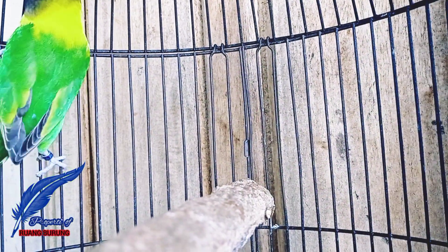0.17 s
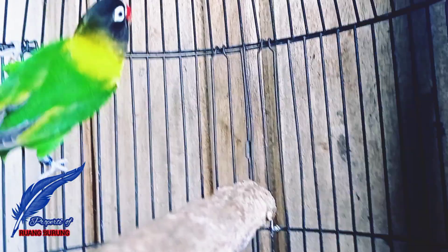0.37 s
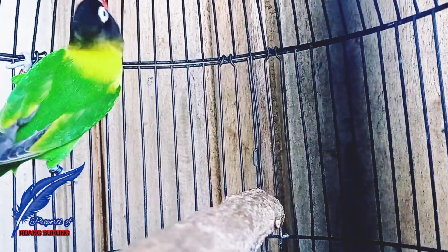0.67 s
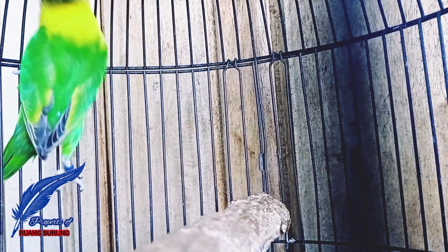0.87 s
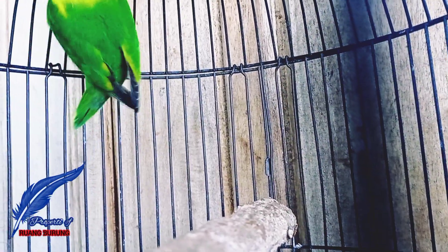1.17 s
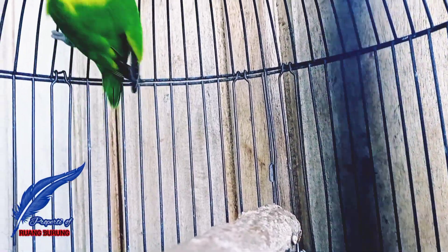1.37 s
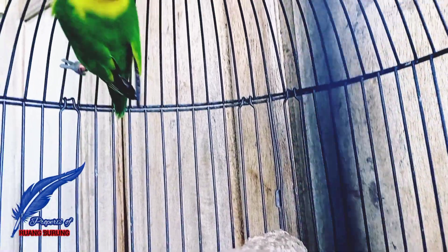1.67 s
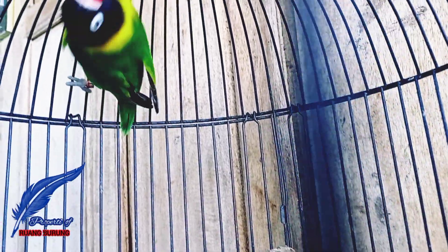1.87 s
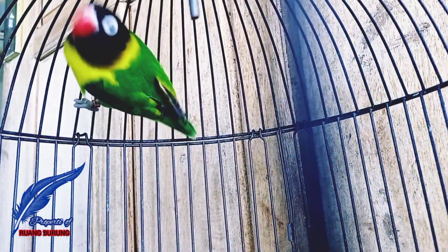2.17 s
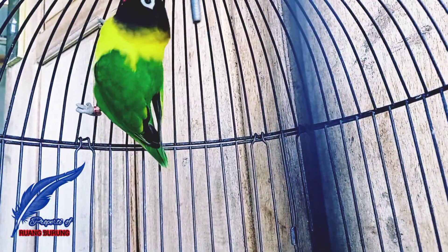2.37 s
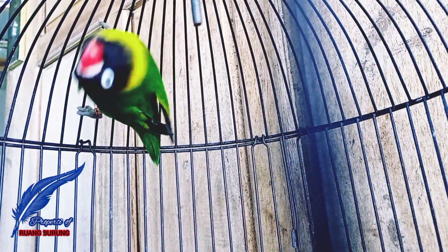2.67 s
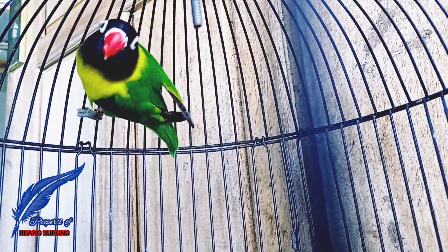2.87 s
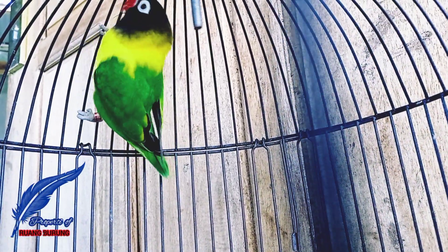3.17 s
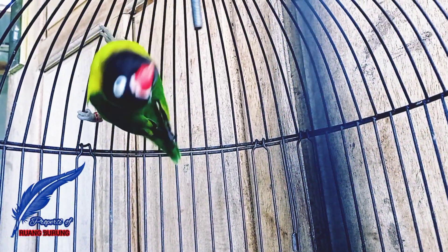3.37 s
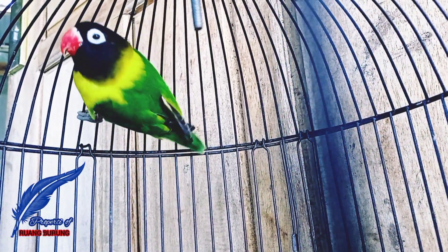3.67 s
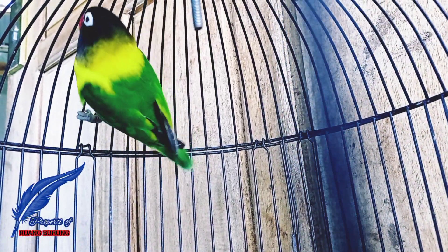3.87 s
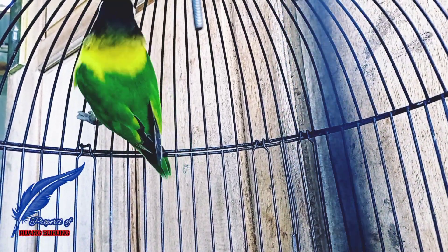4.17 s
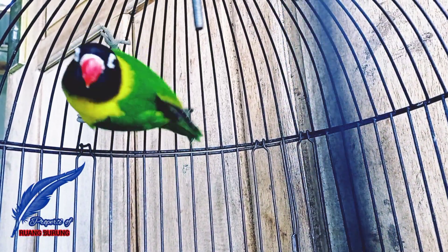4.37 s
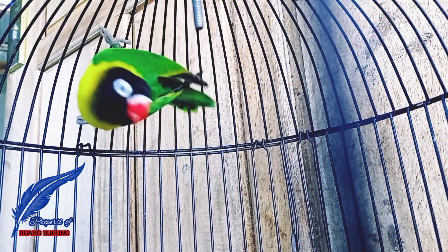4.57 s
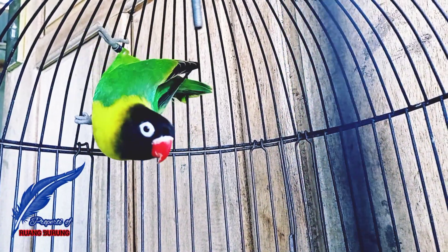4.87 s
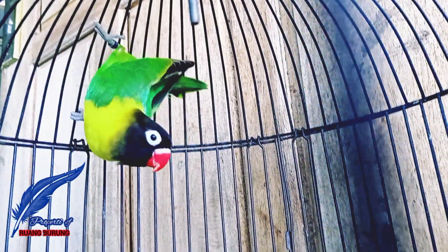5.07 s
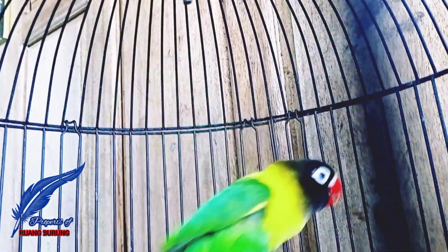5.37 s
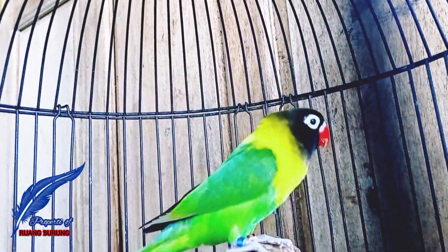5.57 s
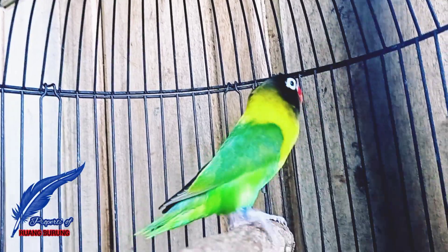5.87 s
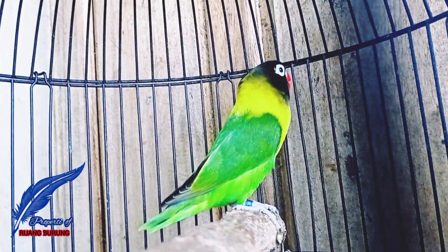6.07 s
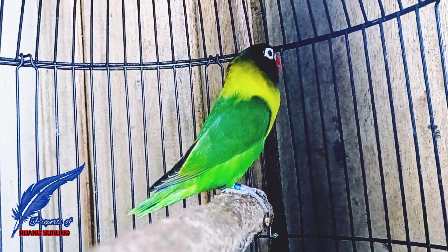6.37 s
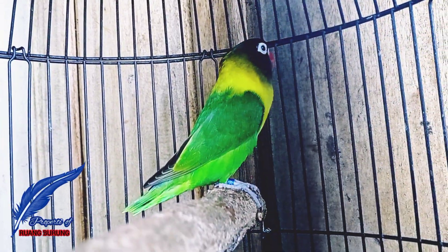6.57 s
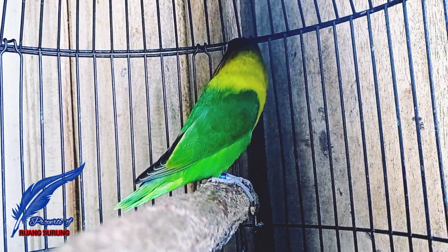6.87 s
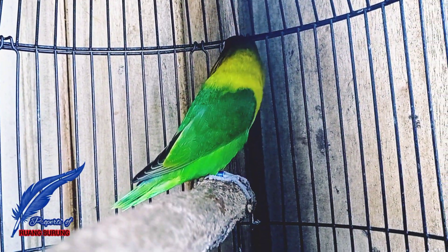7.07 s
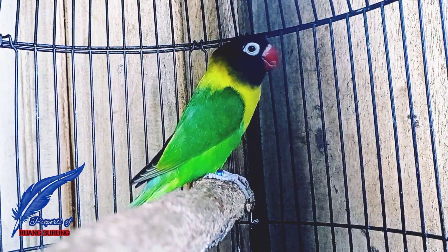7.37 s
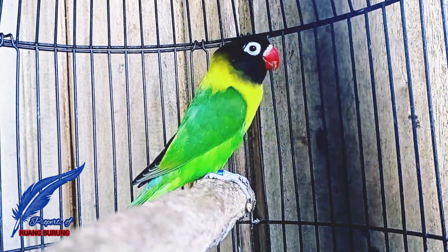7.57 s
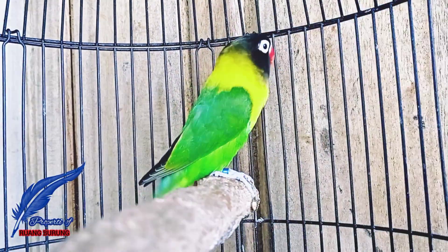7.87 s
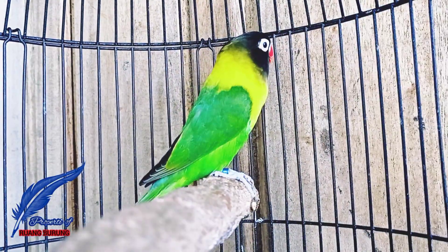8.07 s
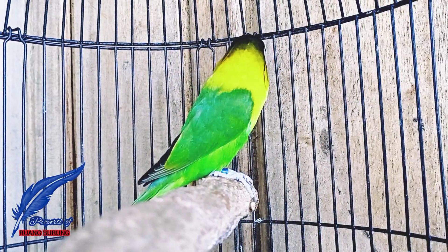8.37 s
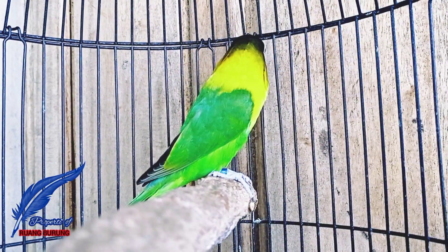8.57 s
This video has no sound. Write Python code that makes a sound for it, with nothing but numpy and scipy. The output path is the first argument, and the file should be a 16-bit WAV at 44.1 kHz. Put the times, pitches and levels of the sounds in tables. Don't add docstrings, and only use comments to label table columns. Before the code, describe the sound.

Rapid, piercing lovebird chatter changes character several times over a faint yard rumble and hum, with a few light wooden knocks and distant coos.

```python
import sys
import numpy as np
from scipy import signal
from scipy.fft import rfft, irfft, next_fast_len
from scipy.io import wavfile
from scipy.ndimage import uniform_filter1d, minimum_filter1d, map_coordinates

SR = 44100
rng = np.random.default_rng(int(sys.argv[2]) if len(sys.argv) > 2 else 0)


def pcm_store(signal):
    levels = np.round(np.clip(np.atleast_2d(signal), -1, 1) * 32767)
    wavfile.write(sys.argv[1], SR, levels.astype(np.int16).T)


def ratio_of_db(decibels):
    return 10 ** (np.asarray(decibels, float) / 20)


N = 384552

# t/s, lead-in/ms, whistle/ms, level/dB, end f/Hz
SLOW_WHISTLES = [(0.0634, 16, 37, -10, 3675), (0.1815, 14.2, 39.2, -9, 3677), (0.301, 13.6, 38, -9.5, 3625),
                 (0.419, 16, 33.6, -9, 3573), (0.537, 13.2, 36, -9.5, 3645),
                 (0.6529, 13.9, 37.3, -9.5, 3610), (0.7724, 14.2, 35, -8.5, 3603),
                 (0.889, 14.7, 35.3, -8, 3670), (1.0085, 15, 35.2, -8.5, 3656),
                 (1.124, 15.2, 33.3, -8.5, 3610), (1.2417, 15.6, 35, -9.5, 3520),
                 (1.3635, 16.4, 34.4, -10, 3534), (1.4836, 15.9, 33, -10.5, 3433),
                 (1.602, 14.2, 36, -9.5, 3516), (1.7207, 16, 34, -9.5, 3480),
                 (1.8429, 13.5, 34.6, -10, 3453), (1.9614, 15, 32.7, -9.5, 3390),
                 (2.083, 14.4, 35, -10, 3310)]
QUICK_WHISTLES = [(6.824, 12.4, 27, -13.5, 4300), (6.926, 10.2, 24, -15, 4150),
                  (7.0303, 8.9, 27, -16, 4330), (7.1302, 7.3, 27.6, -14.5, 4470),
                  (7.2289, 7.8, 28, -13.5, 4420), (7.3305, 8.3, 27.8, -14.5, 4410),
                  (7.4309, 8.8, 26.8, -15, 4360), (7.5334, 8.4, 24, -14, 4455),
                  (7.634, 8.1, 24.6, -15.5, 4330), (7.7356, 7.7, 26.8, -14.5, 4285),
                  (7.8324, 8.3, 22.9, -14.5, 4426), (7.9317, 9.2, 27, -14.5, 4395),
                  (8.0296, 9.7, 27.4, -13, 4500), (8.129, 7.7, 29.4, -14.5, 4410),
                  (8.2299, 8.1, 27, -14, 4440), (8.3264, 9, 28.4, -14, 4430), (8.426, 9.1, 26, -14, 4490),
                  (8.5283, 9.5, 25.6, -13.5, 4430), (8.6319, 10.8, 24.5, -14.5, 4460)]
# t/s, lead-in/ms, warble/ms, level/dB, f/Hz
WARBLE_CALLS = [(2.203, 9.8, 33, -12.5, 2580), (2.3175, 9.1, 32, -12.5, 2797), (2.428, 10.3, 31, -13, 2940),
                (2.5362, 8.3, 32, -14, 2925), (2.6373, 10, 28, -13, 2875), (2.74, 11, 33.7, -14, 2970),
                (2.8504, 8.5, 35, -13, 2930), (2.9593, 10, 32, -14, 2985),
                (3.0661, 11.3, 34.7, -13.5, 2930), (3.1815, 9.7, 37, -14, 3010),
                (3.2937, 9.8, 31.8, -14.5, 3005), (3.4032, 10.5, 33.4, -14, 2980),
                (3.5137, 11.2, 31, -14.5, 2960), (3.6223, 10.4, 35.4, -14.5, 2976),
                (3.7366, 11.6, 37.4, -13.5, 2966), (3.8528, 12.1, 34.4, -13.5, 3070),
                (3.9693, 9.8, 35.6, -15, 3020), (4.0805, 11.5, 35.4, -15, 2968),
                (4.1938, 11.3, 30, -14, 3075), (4.3059, 7.7, 34, -15.5, 2940)]
# share of the note/1, level/dB
NOTE_FADE = [(0, 9), (.1, 4.5), (.8, -4), (1, -17.5)]
# f/Hz, gain/dB
THROAT_GAIN = [(1500, -30), (2000, -18), (3000, -9.5), (4000, 6), (6300, -11), (8400, -1.5), (10500, -15.5),
               (12500, -20), (15500, -36)]


def along(points, hz):
    f, v = np.transpose(points)
    return np.interp(np.log(hz + 1), np.log(f + 1), v)


def shape(rows, at):
    s, *cols = np.transpose(rows)
    return [np.interp(at, s, c) for c in cols]


def shares(ms):
    return np.linspace(0, 1, round(ms * SR / 1000))


def wobble(count, rate):
    knots = rng.standard_normal(int(count * rate / SR) + 4)
    return map_coordinates(knots, [np.arange(count) * rate / SR])


def noise(colour):
    m = next_fast_len(N)
    x = irfft(rfft(rng.standard_normal(m)) * colour(np.fft.rfftfreq(m, 1 / SR)), m)[:N]
    return x / x.std()


def add(out, s, hz, db, rough, tilt_db=0, notch_db=0, notch_hz=9200):
    # f/Hz, then five levels/dB
    registers = [
        (2192, 5.5, -5.5, 9.5, -7, 5),
        (3148, -8.5, 2, -21.5, -4.5, 16),
        (3674, -0.5, 5, 11, 7, -18),
    ]
    count = len(hz)
    jitter = rough * wobble(count, 1400) + 35 * rough ** 2 * wobble(count, 3500)
    hz = uniform_filter1d(hz, size=24) * (1 + jitter).clip(.5, 1.5)
    phase = 2 * np.pi * np.cumsum(hz) / SR
    order = np.arange(1, 6)[:, None]
    colour_db = np.array(shape(registers, hz)) + along(THROAT_GAIN, order * hz) + tilt_db * np.log2(order)
    colour_db += notch_db / (1 + ((order * hz - notch_hz) / 650) ** 2)
    shimmer_db = [50 * rough * wobble(count, 600) for _ in order]
    gain = ratio_of_db(colour_db + shimmer_db) * (order * hz < .4 * SR)
    offset = order * 0.24 + rng.normal(-1.37, 0.58, order.shape)
    tone = (gain * np.sin(order * phase + offset)).sum(axis=0)
    tone /= np.sqrt((gain ** 2).sum(axis=0) / 2)
    swell = ratio_of_db(db + (.8 + 12 * rough) * wobble(count, 400))
    swell = swell * signal.windows.tukey(count, min(1, 60 / count))
    breathiness = (rough / .02) ** .5 * np.ones(count)
    out[:, round(s * SR):][:, :count] += swell * np.array([tone, breathiness])


def contours(out, calls, rough, tilt_db):
    for call in calls:
        hz, db = shape(call, np.arange(call[0][0], call[-1][0], 1 / SR))
        leap = np.minimum(uniform_filter1d(np.abs(np.gradient(hz)), size=130) / 8, 2.5)
        add(out, call[0][0], hz, db, rough * (1 + leap), tilt_db + 0.74 * (db + 10.0))
    return out


def turning_note(out, s, ms, db, hz, rate, start, swing_hz, dip_db, tilt_db, notch_db, fade_db, rough):
    u = shares(ms)
    turns = start + rate * (u * ms / 1000 + .0012 * u * wobble(len(u), 70))
    swing = -np.cos(2 * np.pi * turns)
    pitch_hz = hz * (1.04 - 0.0742 * u) + swing_hz * swing
    add(out, s, pitch_hz, db + fade_db + dip_db * np.minimum(swing, .3), rough, tilt_db, notch_db)


def cold(s):
    return np.exp(-abs(s - QUICK_WHISTLES[0][0]) / 0.125)


def yard():
    # f/Hz, density/dB per Hz
    spectrum = [(15, -30), (25, -6.5), (183, 2.5), (1440, -16.5), (2610, -15), (4160, -16.5), (6980, -18.5),
                (9760, -21), (11100, -22.5), (12000, -25), (15600, -45), (22000, -120)]
    # t/s, rumble level/dB, hiss level/dB
    traffic = [(0, -45, -53), (.8, -47, -58), (1.2, -43, -51.5), (2.7, -46, -54.5), (3.6, -44, -51),
               (4.6, -42.5, -49.5), (5.5, -44.5, -46), (6.1, -42.5, -43.5), (6.9, -41.5, -52),
               (7.2, -47.5, -55), (8.72, -48, -58)]
    # t/s, level/dB
    hum_course = [(0, -61), (1.6, -55), (1.8, -45), (2.2, -45), (2.75, -49.5), (3.4, -44.5), (3.6, -65),
                  (4.05, -45), (5, -44.5), (5.15, -54), (6.4, -51), (7.7, -62), (8.45, -43), (8.72, -62)]
    # f/Hz, level/dB, nearest t/s, fade/s
    passing = [
        (118, -45, 6.16, 1.5),
        (190, -46, 2.3, 1.68),
        (264, -47.5, 4.3, 1.06),
    ]
    # t/s, level/dB, f/Hz, length/s
    coo_calls = [
        (1.4, -51, 960, 0.08),
        (1.667, -49, 1050, 0.21),
        (2.09, -54, 950, 0.16),
        (3.89, -46.5, 1055, 0.083),
        (4.238, -49, 1100, 0.052),
        (4.875, -43, 1110, 0.054),
        (7.16, -47.5, 960, 0.11),
    ]
    t = np.arange(N) / SR
    rumble_db, hiss_db = shape(traffic, t)
    hum_db, = shape(hum_course, t)

    def low(hz):
        return 1 / (1 + (hz / 380) ** 4)

    def line(hz, centre_hz):
        return 1 / (1 + ((hz - centre_hz) / 5) ** 2)

    rumble = noise(lambda hz: ratio_of_db(along(spectrum, hz)) * low(hz))
    rumble *= ratio_of_db(rumble_db + 1.86 + 1.54 * wobble(N, 8.9))
    hiss = noise(lambda hz: ratio_of_db(along(spectrum, hz)) * (1 - low(hz)))
    hiss *= ratio_of_db(hiss_db + 4.5 + 1.8 * wobble(N, 6))
    breeze = ratio_of_db(-52 - 2.6 * t + 2.7 * wobble(N, 2.9)) * noise(lambda f: line(f / 3, 17))
    hum = ratio_of_db(hum_db + 3.5 + 1.0 * wobble(N, 3.42)) * np.sin(2 * np.pi * 72 * t + 2.3 * wobble(N, 7.3))
    out = breeze + rumble + hiss + hum
    for hz, db, s, fade in passing:
        out += ratio_of_db(db - np.minimum(6 * ((t - s) / fade) ** 2, 9)) * noise(lambda f: line(f, hz))
    for s, db, hz, span in coo_calls:
        swell = np.sin(np.pi * np.clip((t - s) / span, 0, 1))
        out += ratio_of_db(db) * swell * noise(lambda f: line(f / 22, hz / 22))
    return out


def whistle_end():
    return ratio_of_db(-18.5) * np.sin(2 * np.pi * 3700 * np.arange(400) / SR) * np.linspace(1, 0, 400)


def tongue_ticks():
    out, t = np.zeros(N), np.arange(SR // 100) / SR
    for calls, ahead in [(SLOW_WHISTLES, .013), (QUICK_WHISTLES, .019)]:
        for s, *_ in calls:
            ring = np.sin(2 * np.pi * 2000 * t) * np.minimum(1, t / 0.00054)
            out[round((s - ahead) * SR):][:len(t)] += ratio_of_db(-29 + 4 * rng.standard_normal() - 60 * t / 0.0044) * ring
    return out


def lead_ins(out):
    # share of the lead-in/1, pitch factor/1, level/dB
    slow_lead = [(0, 1.19, -17), (0.081, 0.99, -6.5), (.62, 1.03, -3.5), (.7, 1.258, -3), (.88, 1.207, -6),
                 (1.01, 1.95, 3.5)]
    quick_lead = [(0, 1.27, -0.5), (.12, 0.906, -3), (.35, 1.04, 8.5), (.6, 1.65, 3.5), (.85, 1.3, -3),
                  (1, 1.55, 0.5)]
    warble_lead = [(0, 0.96, -0.5), (.12, 1.001, 1), (.6, 1.01, 3.5), (1.01, 1.027, -2)]
    # calls, shape, f/Hz, roughness/1, then tilt/dB per octave, notch/dB, notch f/Hz
    for calls, form, lead_hz, rough, *colour in [
            (SLOW_WHISTLES, slow_lead, 2129, .02, -7.5, -14, 4900),
            (QUICK_WHISTLES, quick_lead, 2259, .025, -1.5),
            (WARBLE_CALLS, warble_lead, 2090, .02, .3, -11, 4250)]:
        for s, lead_ms, _, db, _ in calls:
            factor, swell_db = shape(form, shares(lead_ms + 0.64))
            hz = lead_hz * (1 + 0.008 * rng.standard_normal() + 0.26 * cold(s))
            add(out, s, hz * factor, db + swell_db, rough * factor ** 2, *colour)


def whistles(out):
    # share of the note/1, factor on the end pitch/1, level/dB
    slow_fall = [(0, 1.2, 0), (.04, 1.26, 1.5), (.12, 1.2, 1), (.155, 1.17, -5), (.2, 1.14, 0),
                 (.4, 1.058, 1), (.7, 1.012, .3), (.92, .995, -3.5), (1.05, .98, -14)]
    quick_fall = [(0, 1.12, 6), (0.068, 1.09, -1), (.3, 1.03, 0), (.5, 1.006, 3), (.78, 1.0, -3.5),
                  (1.05, .992, -21)]
    for calls, form, tilt_db in [(SLOW_WHISTLES, slow_fall, -1.5), (QUICK_WHISTLES, quick_fall, -.3)]:
        for s, lead_ms, ms, db, end_hz in calls:
            height, swell_db = shape(form, 1.05 * shares(1.05 * ms))
            height = 1 + (height - 1) * (1 - .8 * cold(s)) * (1 + 0.061 * rng.standard_normal())
            rough = .007 * (1 + 14 * np.abs(height - 1))
            add(out, s + lead_ms / 1000, end_hz * height, db + swell_db, rough, tilt_db)


def answers():
    replies = [
        (0.084, -4, 10.4, -9.5, 6230, 1.15),
        (5.309, 9.5, 17, -11, 6160, 0.94),
        (5.390, 11, 25, -15, 5960, 0.71),
        (7.299, 27, 23.2, -12, 6480, 0.87),
        (7.909, -0.5, 14.6, -9, 6540, 1.02),
    ]
    # share of the note/1, pitch factor/1, level/dB
    reply_shape = [(0, 1.01, -8), (.2, 1.005, -6.5), (.55, 1.001, -2.5), (1.01, .97, -16)]
    lead_shape = [(0, 2140, -21), (.75, 2480, -21), (.92, 2860, -13)]

    def lead(s, ms, db):
        return [(s - (1 - u) * ms / 1000, f, db + d) for u, f, d in lead_shape]

    leads, notes = [], []
    for s, lead_ms, ms, db, hz, start in replies:
        glides = lead_ms > 15
        if 0 < lead_ms < 15:
            leads.append(lead(s + 0.0025, lead_ms + 3, db))
        note = [(s + u * ms / 1000, hz * (f if u else start), db + d) for u, f, d in reply_shape]
        notes.append((lead(s, lead_ms, db) if glides else []) + note)
    return leads, notes


def far_parrot():
    leads, notes = answers()
    out = contours(np.zeros((2, N)), leads, .018, tilt_db=9)
    return contours(out, notes, .018, tilt_db=0.0)[0]


def perch():
    # t/s, level/dB, f/Hz, t60/s
    knocks = [
        (0.45, -28, 950, 0.0064),
        (7.235, -21.5, 370, 0.014),
        (8.437, -25, 240, 0.021),
    ]
    out, t = np.zeros(N), np.arange(SR // 10) / SR
    for s, db, hz, t60 in knocks:
        modes = np.sin(2 * np.pi * hz * t) + 3.5 * np.sin(2 * np.pi * 0.63 * hz * t)
        out[round(s * SR):][:len(t)] += ratio_of_db(db - 60 * t / t60) * modes * np.minimum(1, t * hz / 1.0)
    return out


def warbles(out):
    for s, lead_ms, ms, db, hz in WARBLE_CALLS:
        u = shares(ms)
        sag_db = np.minimum(shape(NOTE_FADE, u)[0], -7.5 * u)
        fade_db = sag_db + 5.5 + .8 * wobble(len(u), 480)
        turning_note(out, s + lead_ms / 1000, ms, db, hz, rate=250 - 12 * (s - 2.2), start=.08,
                     swing_hz=285 * (hz / 2900) ** 4, dip_db=-2.5, tilt_db=3.5, notch_db=-20,
                     fade_db=fade_db, rough=.032)


def broken_calls(out):
    chips = [(4.4138, -19, 5.5, 24.8, -14.5), (4.5152, -17.5, 9.1, 25.5, -17.5),
             (4.6166, -15, 8.5, 22.5, -16.5), (4.716, -23, 7.7, 22.3, -15), (4.8147, -19.5, 8, 25, -17.5),
             (4.916, -19, 9.4, 22.3, -16.5), (5.0158, -22, 7.4, 24.5, -16), (5.1202, -29, 9.9, 26.2, -18),
             (5.2255, -36, 8.8, 24, -17), (5.328, -46, 9.4, 26, -16), (5.435, -43, 9.5, 19, -15.5),
             (5.5411, -32, 9.3, 22.3, -16), (5.6415, -40, 8.2, 25, -15), (5.749, -38, 8.7, 23, -16.5),
             (5.8525, -50, 8.6, 19.3, -14.5), (5.9613, -45, 10.9, 21, -16)]
    rasp_fade = [(0, 6), (.1, 4), (.65, 2), (.8, -5.5), (1.01, -25)]
    tick_ms = 4
    chip_colour = dict(swing_hz=0, dip_db=4.5, tilt_db=2.5, notch_db=-8, rough=.035)
    for s, tick_db, wait_ms, rasp_ms, db in chips:
        a, b, c, d = rng.standard_normal(4)
        turning_note(out, s - 0.0096, tick_ms, tick_db, 2800, rate=118, start=0.636,
                     fade_db=shape(NOTE_FADE, shares(tick_ms))[0], **{**chip_colour, "swing_hz": 700})
        chip_ms = wait_ms - 2.84
        turning_note(out, s, chip_ms, db + 6, 3200 * (1 + 0.067 * a), rate=100, start=.47 + 0.0592 * b,
                     fade_db=shape(NOTE_FADE, shares(chip_ms))[0], **{**chip_colour, "swing_hz": 1050})
        ms = rasp_ms * 1.25
        u = shares(ms)
        fade_db = shape(rasp_fade, u)[0] + 4.5 * np.minimum(wobble(len(u), 480), 1)
        turning_note(out, s + wait_ms / 1000, ms, db, 2860 * (1 + 0.0418 * c), rate=190 * (1 + .2 * d),
                     start=0.17, swing_hz=470, dip_db=2.5, tilt_db=4, notch_db=-8, fade_db=fade_db, rough=.04)


def opening_cries(out):
    # t/s, f/Hz, level/dB
    parts = [
        [(6.058, 2210, -18), (6.061, 2280, -13.5), (6.075, 2820, -10.5), (6.087, 3030, -5), (6.092, 2580, -25)],
        [(6.0915, 5100, -8), (6.095, 4740, -11), (6.108, 4680, -15.5), (6.115, 4570, -25)],
        [(6.163, 2080, -40), (6.171, 2080, -20.5), (6.176, 3800, -14), (6.194, 4020, -3.5), (6.1965, 3450, 1),
         (6.1985, 4100, -10), (6.2005, 3410, -12), (6.203, 4200, -12), (6.214, 4000, -19)],
    ]
    contours(out, parts, .016, tilt_db=-1.5)


def flipping_cries(out):
    # t/s, lead-in f/Hz, flip after/ms, flip f/Hz, level just before the flip/dB
    flip_calls = [
        (6.27, 1820, 30, 5860, -14),
        (6.377, 2046, 29.6, 6400, -19),
        (6.488, 2030, 30.2, 6300, -19),
        (6.597, 2060, 31, 6450, -21),
        (6.709, 1968, 32.6, 6610, -24),
    ]
    # t/ms, level/dB
    climb = [(0, -26.5), (12.5, -16)]
    # t/ms, f/Hz, level/dB
    settle = [(4, 4850, -14), (12, 4730, -10.5), (18, 3800, -49)]
    top_hz = 4245
    calls = []
    for s, lead_hz, flip_ms, flip_hz, catch_db in flip_calls:
        points = [(ms, lead_hz, db) for ms, db in climb]
        points += [(18, 3554, -12),
                   (flip_ms - 5.5, top_hz, -2.5),
                   (flip_ms - 5.29, top_hz + 110, catch_db),
                   (flip_ms, flip_hz, -5.5)]
        points += [(flip_ms + ms, hz, db) for ms, hz, db in settle]
        calls.append([(s + ms / 1000, hz, db) for ms, hz, db in points])
    contours(out, calls, .016, tilt_db=-4.5)


def parrot():
    out = np.zeros((2, N))
    for notes in (lead_ins, whistles, warbles, broken_calls, opening_cries, flipping_cries):
        notes(out)
    voice, loudness = out
    breath = noise(lambda hz: ratio_of_db(along(THROAT_GAIN, hz) - 8 / (1 + ((hz - 5100) / 500) ** 2)))
    return voice + tongue_ticks() + ratio_of_db(-22.5) * loudness * breath


def boards(x):
    t = np.arange(SR // 12) / SR
    tail = rng.standard_normal(len(t)) * ratio_of_db(-60 * t / 0.027) * (t > .0015)
    return signal.fftconvolve(x, tail / np.linalg.norm(tail))[:N]


def room(x):
    # f/Hz, t60/s
    wall_decay = [(1500, 0.11), (4000, 0.43), (8000, 0.22), (12000, 0.2)]
    hz, t, z = signal.stft(rng.standard_normal(SR // 2), SR, nperseg=256)
    tail = signal.istft(z * ratio_of_db(-60 * t / along(wall_decay, hz)[:, None]), SR, nperseg=256)[1]
    return signal.fftconvolve(np.pad(x, (200, 0)), tail / np.linalg.norm(tail))[:N]


def scene():
    near = parrot()
    near[:400] += whistle_end()
    far = far_parrot()
    echoes = ratio_of_db(-13) * boards(near + far) + room(ratio_of_db(-28.5) * near + ratio_of_db(-7.5) * far)
    mono = near + far + echoes + yard() + perch()
    return np.array([mono, mono])


def hush(x):
    hz, _, z = signal.stft(x, SR, nperseg=256)
    power = uniform_filter1d(uniform_filter1d(np.abs(z) ** 2, size=3, axis=1), size=7, axis=2)
    openness = power ** 2 / (power ** 2 + ratio_of_db(-73) ** 4)
    gain = np.where(hz[:, None] > 4400, ratio_of_db(-14 * (1 - openness)), 1)
    return signal.istft(z * gain, SR, nperseg=256)[1][:, :N]


def roll_off(x):
    return signal.sosfilt(signal.butter(12, 16800, fs=SR, output="sos"), x)


def record(dry):
    hz = np.fft.rfftfreq(N, 1 / SR)
    treble_drop = ratio_of_db(-54) + 1 / (1 + (hz / 12050) ** 70) + ratio_of_db(-32) / (1 + (hz / 13300) ** 60)
    bass_drop = 1 + (36 / (hz + 1)) ** 4
    heard = hush(irfft(rfft(dry) * treble_drop / bass_drop, N))
    need = minimum_filter1d(np.minimum(1, 1.02 / (np.abs(heard) + 1e-9)), size=120)
    heard = heard * uniform_filter1d(need, size=60)
    rounded = heard / (1 + np.abs(heard / .87) ** 6) ** (1 / 6)
    kept = rfft(rounded) / (1 + (hz / 15900) ** 80)
    treble = irfft(kept[0] / (1 + (10500 / (hz + 1)) ** 8), N)
    loudness = uniform_filter1d(np.abs(treble), size=600)
    side = ratio_of_db(-4) * np.tanh(wobble(N, 100)) * treble * loudness / (loudness + .012)
    return roll_off(irfft(kept, N) + side * [[1], [-1]])


dry = scene()
out = record(dry)
pcm_store(out)
```